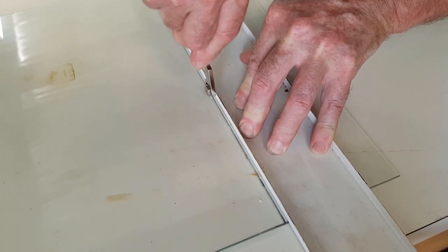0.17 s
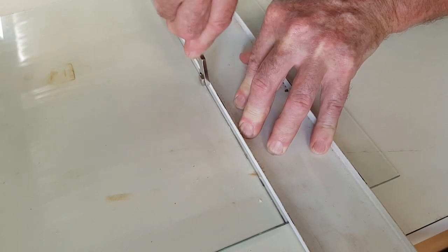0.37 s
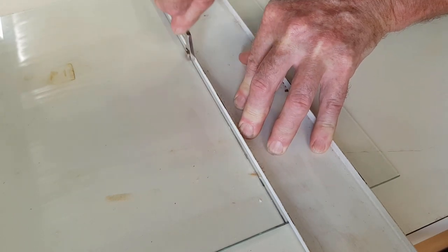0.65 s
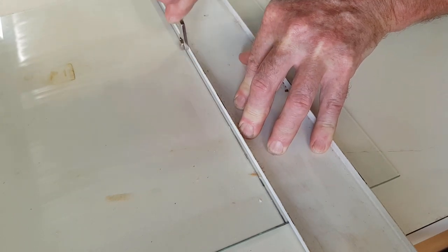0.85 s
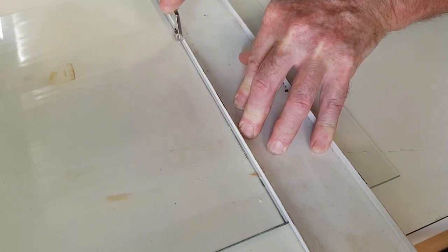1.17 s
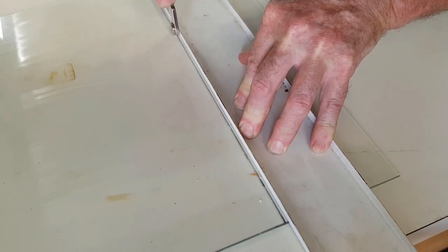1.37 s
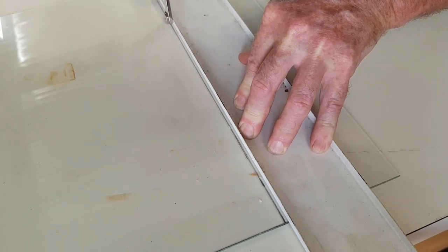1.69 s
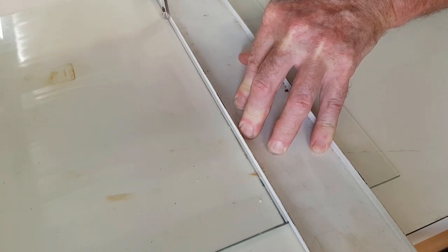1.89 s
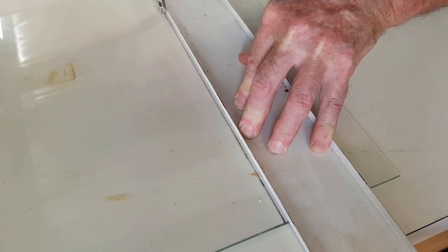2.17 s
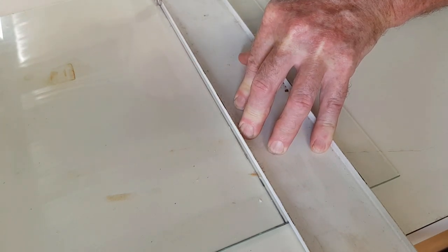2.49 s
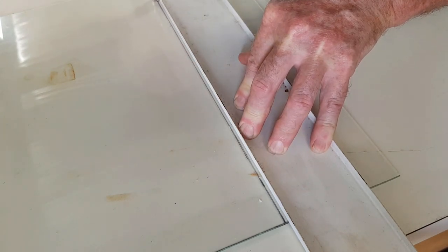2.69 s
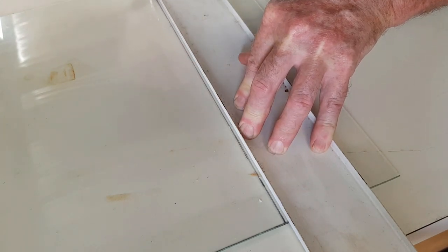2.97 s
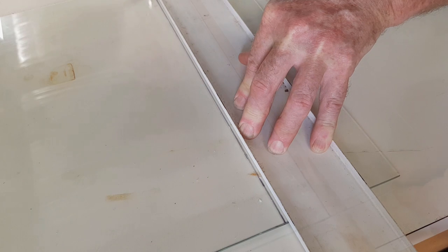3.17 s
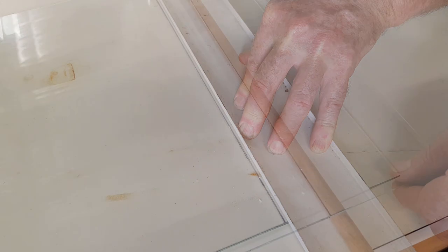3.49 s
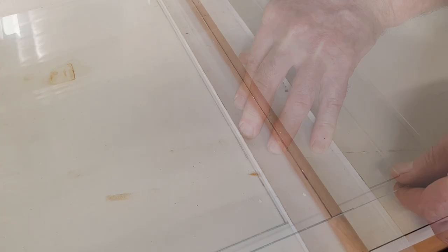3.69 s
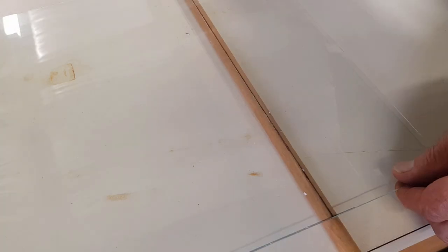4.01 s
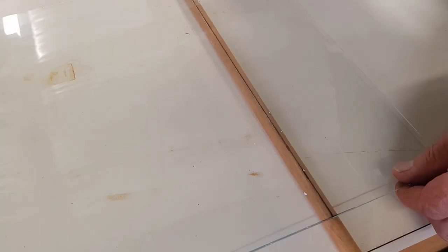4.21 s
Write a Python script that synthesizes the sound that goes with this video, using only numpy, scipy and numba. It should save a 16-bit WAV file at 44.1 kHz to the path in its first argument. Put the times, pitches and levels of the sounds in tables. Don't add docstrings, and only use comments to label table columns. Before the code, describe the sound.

Bright, jerky singing of a small wheel on glass turns to dense crackle, then fades to a quiet room with two muted wood knocks.

```python
import sys
import numpy as np
from scipy import signal
from scipy.fft import rfft, irfft, next_fast_len
from scipy.io import wavfile
from scipy.ndimage import uniform_filter1d
from numba import njit

SR = 44100
rng = np.random.default_rng(int(sys.argv[2]) if len(sys.argv) > 2 else 0)


def inscribe(sig):
    pcm = np.round(np.clip(np.atleast_2d(sig).T, -1, 1) * 32767)
    wavfile.write(sys.argv[1], SR, pcm.astype(np.int16))


def gain_from_decibels(decibels):
    exponent = np.asarray(decibels, float) / 20
    return 10 ** exponent


N = 191614

ROOM_T60_S, ROOM_DB = 0.17, -11
CRUNCH_FROM_S = 1.335


def level(x, db=0):
    return x * gain_from_decibels(db) / np.sqrt(np.mean(x ** 2))


def curves(table):
    s, *columns = np.transpose(table)
    return [np.interp(np.arange(N) / SR, s, column) for column in columns]


def colour(x, points):
    size = next_fast_len(N + SR)
    hz, db = np.transpose(points)
    bin_hz = np.arange(size // 2 + 1) * SR / size
    gain = gain_from_decibels(np.interp(np.log(bin_hz + 1), np.log(hz), db))
    return irfft(rfft(x, size) * gain, size)[..., :N]


@njit
def svf(x, hz, width):
    y, b, l = np.empty(len(x)), 0., 0.
    for i in range(len(x)):
        g, k = np.tan(np.pi * hz[i] / SR), width / hz[i]
        v = (b + g * (x[i] - l)) / (1 + g * (g + k))
        b, l, y[i] = 2 * v - b, l + 2 * g * v, k * v
    return y


def band(x, hz, width):
    return svf(x, np.full(N, 1. * hz), 1. * width)


def walk(rate):
    k = max(int(SR / rate), 1)
    held = np.repeat(rng.standard_normal(N // k + 1), k)
    return 1.13 * uniform_filter1d(uniform_filter1d(held, k), k)[:N]


def decay(t, t60_s):
    return np.exp(-np.log(1000) * t / t60_s)


def burst(t60_s):
    t = np.arange(SR // 2) / SR
    puff = rng.standard_normal(len(t)) * decay(t, t60_s)
    return puff / np.sqrt(np.sum(puff ** 2))


def steady(x, s):
    swell = uniform_filter1d(uniform_filter1d(x ** 2, int(s * SR)), int(s * SR))
    return level(x / (np.abs(swell) + 1e-18) ** 0.33)


def swells(s, hold_s, levels_db, rise_db_s, fall_db_s):
    late = np.arange(0, N, 64)[:, None] / SR - s
    shape = gain_from_decibels(rise_db_s * np.minimum(late, 0) - fall_db_s * np.maximum(late - hold_s, 0))
    return [np.repeat(np.sqrt(shape ** 2 @ gain_from_decibels(db) ** 2), 64)[:N] for db in levels_db]


# (frequency [Hz], density [dB per Hz])
AIR_SPECTRUM = [(60, 6.5), (150, 13), (300, 0), (700, -5), (1550, -4.5), (2300, -4.5), (3500, -11),
                (6000, -19), (9000, -24), (12000, -6), (14900, -7), (16500, -18.5)]


def air():
    noise = level(colour(rng.standard_normal((2, N)), AIR_SPECTRUM), -66.5)
    noise[1] = colour(noise[1], [(300, -1.0), (3000, -7.0), (8000, -2.0), (12000, -0.5)])
    return noise


# (time [s], length [ms], level [dB], wheel ring [Hz])
SINGING_JERKS = [(0.033, 5.6, -52, 12700), (.062, 5, -40, 13200), (.068, 35.4, -49.5, 13000),
                 (.132, 4, -33, 13120), (.138, 19, -39.5, 12400), (0.158, 3.9, -30.5, 11940),
                 (.169, 4.8, -42, 12110), (.237, 11, -45, 13000), (.241, 2.3, -38, 13000),
                 (.249, 8.4, -36, 12300), (0.34, 16.9, -35.5, 12410), (.388, 4.5, -41, 13460),
                 (.4495, 4.8, -30, 12310), (.475, 3.5, -32, 11600), (.496, 8.4, -31.5, 11670),
                 (0.5002, 3.5, -22.5, 11520), (.508, 8, -33, 11600), (.553, 3, -32, 12080),
                 (0.555, 6.3, -27.5, 12020), (0.562, 8.5, -30, 11330), (0.572, 27, -44, 11500),
                 (0.595, 10, -37, 12300), (0.61, 13.4, -44.5, 12430), (0.74, 7, -55, 11800),
                 (.798, 27, -56, 12100), (.889, 3.7, -55, 10800), (.895, 18, -58, 11940),
                 (.964, 7, -53.5, 10700), (1.033, 3.5, -54.5, 10600), (1.083, 6.3, -57, 11800),
                 (1.149, 20, -58, 12300), (1.171, 5.3, -39.5, 13640), (1.252, 7.9, -52, 12700),
                 (1.28, 7.4, -57.5, 10800), (1.29, 3.5, -45.5, 10200)]
# (time [s], length [ms], level [dB])
CRUNCHING_JERKS = [(1.348, 25, -51.5), (1.378, 19.4, -34.5), (1.409, 5.4, -38), (1.419, 6.3, -40),
                   (1.438, 16.3, -36.5), (1.461, 3.6, -39), (1.486, 18, -38.5), (1.504, 41.6, -38.5),
                   (1.56, 49, -40.5), (1.61, 19, -41.5), (1.631, 23, -49), (1.657, 36, -40.5),
                   (1.695, 59, -41.5), (1.755, 7, -64), (1.992, 5, -55), (1.9958, 8.6, -43.5),
                   (2.037, 13, -39), (2.128, 11.5, -45.5), (2.15, 19.7, -39), (2.211, 35, -41.5),
                   (2.253, 51, -39), (2.295, 101, -41), (2.569, 36, -41.5), (2.61, 18, -38),
                   (2.629, 47, -40.5), (2.68, 73, -42), (2.751, 17, -46.5), (2.767, 18.4, -39.5),
                   (2.937, 4.1, -47.5), (2.948, 86, -37), (3.102, 24, -46.5), (3.119, 8.4, -37),
                   (3.403, 6.6, -47), (3.413, 39, -36), (3.453, 14, -40)]
# (time [s], length [ms], level [dB])
TICKS = [(.445, 5.7, -47), (0.641, 4.3, -39.5), (0.978, 8.8, -51.5), (.994, 4.4, -54.5),
         (1.773, 2.9, -39.5), (2.01, 4.1, -45), (1.315, 2.2, -52), (1.3445, 2.6, -39), (1.476, 4.7, -47),
         (1.821, 2.9, -46), (1.836, 6.3, -46.5), (1.938, 2.4, -52), (2.062, 4.3, -37.5), (2.202, 5.2, -41),
         (2.531, 2.1, -44), (2.537, 3.4, -57), (2.545, 2.5, -48), (2.459, 2.8, -54), (2.494, 2.5, -57.5),
         (2.519, 3.5, -55), (2.562, 4, -47), (2.904, 4.3, -59), (3.098, 3.1, -37), (3.148, 5.3, -46.5),
         (3.289, 4.8, -56), (3.2985, 2.9, -49), (3.312, 2.9, -42), (3.32, 3.2, -50), (3.327, 2.5, -56),
         (3.209, 20, -62.5), (3.476, 1.7, -43), (3.486, 2.8, -59), (.195, 2.7, -44), (.703, 2.8, -55),
         (.817, 2.1, -57), (.94, 2.5, -57), (.95, 2.5, -63), (1.069, 2.5, -66), (1.327, 2.8, -53),
         (1.355, 2.5, -57), (1.865, 2.5, -59), (1.97, 2.3, -64), (2.113, 2.3, -50), (3.396, 3.2, -45)]
# (time [s], level [dB])
DRAG = [(0, -58), (.12, -55.5), (.22, -70), (.33, -60.5), (.42, -60), (.66, -52), (.79, -61.5),
        (.86, -70.5), (.94, -63.5), (1.03, -69), (1.1, -76), (1.22, -63.5), (1.3, -76), (1.86, -59),
        (1.91, -68), (2.0, -75), (2.5, -64.5), (3.2, -78), (4.34, -92.5)]
SKIPS = [.153, .245, .56, 1.379, 1.386, 1.457, 1.492, 1.581, 1.663, 1.669, 1.689, 1.724, 2.046, 2.134,
         2.217, 2.224, 2.238, 2.264, 2.283, 2.316, 2.574, 2.607, 2.639, 2.658, 2.669, 2.941, 2.972, 2.976,
         2.988, 2.715]


def jerks():
    # (drop [dB], trail [dB per s])
    sing_trail, crunch_trail, tick_trail = (-13, 310), (-8.5, 296), (-14, 310)
    rest_hz, relax_s = 12410, 0.019
    drift_from_s, drag_ring_to_s = 1.65, .86
    drag_ring, early_ring, crunch_ring = .45, .24, .1
    silent_db, pure_db = -60, -20
    skip_s, skip_db, crack_delay_s = .0035, -10, .0004

    force, ring_hz, first = gain_from_decibels(curves(DRAG)[0]), np.full(N, 1. * rest_hz), np.zeros(N)
    rows = [row[:3] + sing_trail + row[3:] for row in SINGING_JERKS]
    late = [row + crunch_trail for row in CRUNCHING_JERKS] + [row + tick_trail for row in TICKS]
    rows += [row + (hz,) for row, hz in zip(late, rng.uniform(10100, 13500, len(late)))]
    after = np.arange(SR // 5) / SR
    for s, ms, db, drop_db, trail, hz in sorted(rows):
        a = int(s * SR)
        span = slice(a, a + len(after))
        first[a + int(crack_delay_s * SR)] = gain_from_decibels(db) > 2 * force[a - 1]
        since = after - ms / 1000
        force[span] = np.maximum(force[span], gain_from_decibels(db + (since > 0) * (drop_db - trail * since)))
        if s > drift_from_s or trail == sing_trail[1]:
            ring_hz[span] = rest_hz + (hz - rest_hz) * np.exp(-np.maximum(since, 0) / relax_s)
    share = np.clip((20 * np.log10(force) - silent_db) / (pure_db - silent_db), 0, .93)
    drag_end = int(drag_ring_to_s * SR)
    share[:drag_end] = np.maximum(share[:drag_end], drag_ring)
    share[int(CRUNCH_FROM_S * SR):] = early_ring
    share[int(drift_from_s * SR):] = crunch_ring
    for s in SKIPS:
        force[int(s * SR):int((s + skip_s) * SR)] *= gain_from_decibels(skip_db)
        first[int((s + skip_s + crack_delay_s) * SR)] = 0.91
    rough = gain_from_decibels(1.4 * walk(400) + .5 * walk(83))
    return np.abs(uniform_filter1d(force, int(0.00031 * SR))) * rough, ring_hz, share, first


def cracks(per_s, spread_db, lone_per_s=0):
    when, sign, luck = rng.random((N, 3)).T
    size = gain_from_decibels(spread_db * np.minimum(-np.log(1 - luck), 2.9))
    size = np.where(when < lone_per_s / SR, gain_from_decibels(11 - 6 * luck), size)
    return level((when < per_s / SR) * np.sign(sign - .5) * size)


# (frequency [Hz], width [Hz], level [dB])
WHEEL_UPPER = [(13950, 350, -5), (15300, 380, -9.5)]


def singing(force, ring_hz, share):
    drive, width = force * np.sqrt(share), 650.
    shower = cracks(per_s=3000, spread_db=5.5)
    hits = shower * drive
    struck = svf(hits, ring_hz, width) / np.sqrt(np.mean(band(shower, 17000, width) ** 2))
    for hz, w, db in WHEEL_UPPER:
        struck = struck + gain_from_decibels(db) * band(hits, hz, w) / np.sqrt(np.mean(band(shower, hz, w) ** 2))
    keep = np.exp(-1 / (0.0018 * SR))
    swell = signal.lfilter([1 - keep], [1, -keep], drive * share ** 2.28)
    turns = 2 * np.pi * np.cumsum(ring_hz * (1 + .009 * walk(250))) / SR
    squeal = np.sqrt(2) * np.sin(turns) * gain_from_decibels(2.5 * walk(350))
    return np.sqrt(1 - 1.03 * share) * struck + 4.04 * swell * squeal


# (time [s], first lag [ms], second lag [ms])
ECHOES = [(0, 0.38, 0.77), (.55, 0.35, 0.8), (1.5, 0.61, 1.09), (1.7, 0.68, 2.07), (2.0, 0.5, 1.27),
          (2.3, 0.65, 1.4), (2.7, .46, 2.2), (3.0, 0.48, 1.62), (3.43, 0.29, 0.76)]


def delayed(x, ms):
    return np.interp(np.arange(N) - np.round(ms * SR / 1000), np.arange(N), x)


def echoed(x):
    return level(x + gain_from_decibels(-17.5) * sum(delayed(x, ms) for ms in curves(ECHOES)))


# (time [s], peak [dB])
HARD_EARLY = [(1.344, -26), (1.3766, -29), (1.3839, -26), (1.3907, -25), (1.3923, -24), (1.3952, -26),
              (1.4399, -27), (1.4495, -25), (1.4515, -27), (1.489, -28), (1.4965, -29), (1.5093, -26),
              (1.5156, -23), (1.5172, -25), (1.5218, -28), (1.524, -27), (1.528, -26), (1.5334, -26),
              (1.5354, -27), (1.5432, -28), (1.5615, -28), (1.5713, -28), (1.5777, -28), (1.5797, -28),
              (1.586, -26), (1.5923, -25), (1.5939, -28), (1.5975, -25), (1.6082, -27), (1.6578, -25),
              (1.6815, -28), (1.719, -27), (1.7331, -27), (1.752, -29), (2.0386, -27), (2.0442, -28),
              (2.153, -28), (2.1668, -27), (2.2557, -29), (2.2984, -27), (2.3033, -27), (2.3058, -28),
              (2.3125, -27), (2.3202, -28), (2.3222, -28), (2.3247, -25), (2.3266, -25), (2.3339, -26),
              (2.3365, -25), (2.3399, -24), (2.346, -29), (2.3532, -28), (2.3562, -28), (2.36, -26),
              (2.367, -29), (2.3784, -23), (2.3885, -28), (2.393, -26), (2.3966, -27), (2.4002, -29)]
# (time [s], peak [dB])
HARD_LATE = [(2.5773, -26), (2.5815, -26), (2.5837, -25), (2.6146, -26), (2.6339, -26), (2.6854, -24),
             (2.6951, -26), (2.6996, -22), (2.7042, -26), (2.7079, -26), (2.7117, -26), (2.7181, -25),
             (2.723, -25), (2.726, -26), (2.731, -24), (2.7336, -24), (2.7358, -24), (2.7385, -26),
             (2.7408, -26), (2.7434, -25), (2.7459, -24), (2.7492, -25), (2.7654, -26), (2.7679, -24),
             (2.7707, -23), (2.7755, -24), (2.7784, -21), (2.7822, -24), (2.9503, -23), (2.9538, -25),
             (2.9556, -25), (2.9576, -25), (2.9643, -23), (2.9807, -25), (2.9838, -24), (2.9952, -24),
             (3.0037, -23), (3.0059, -23), (3.0105, -24), (3.0127, -21), (3.0149, -22), (3.0175, -21),
             (3.0191, -24), (3.024, -25), (3.0263, -25), (3.0329, -26), (3.0363, -25), (3.0982, -25),
             (3.1245, -22), (3.1266, -26), (3.3128, -26), (3.4037, -25), (3.4134, -22), (3.4155, -24),
             (3.4199, -25), (3.4227, -26), (3.4286, -25), (3.4314, -26), (3.4345, -26), (3.4443, -22)]
# (time [s], peak [dB])
HARD_OPENING = [(1.4632, -31), (1.4765, -33), (1.6965, -31), (1.7465, -31), (1.8215, -38), (1.8365, -33),
                (1.998, -31), (2.011, -32), (2.0635, -29), (2.1292, -33), (2.203, -30), (2.5308, -29),
                (2.5362, -31), (2.563, -36), (2.5705, -29), (2.6293, -27), (2.643, -29), (2.662, -29),
                (2.6735, -31), (2.6842, -26), (2.938, -28), (2.9398, -28), (3.1483, -29), (3.2985, -28),
                (3.32, -29), (3.396, -30), (3.4762, -30), (3.407, -27), (3.4106, -29), (3.417, -26),
                (3.4213, -28), (3.4245, -28), (3.4432, -23), (3.4608, -30), (3.4655, -28)]
# (frequency [Hz], density [dB per Hz])
CRACK_SPECTRUM = [(3000, -62), (5000, -22.5), (6650, -26.5), (9060, -10), (10000, -1), (12600, 2.5),
                  (15600, 0.5), (16300, -17.5), (16500, -31)]


def hard():
    s, db = np.transpose(HARD_EARLY + HARD_LATE + HARD_OPENING)
    smear_s, echo_db = .0012, -9
    clicks = np.zeros(N)
    clicks[(s * SR).astype(int)] = gain_from_decibels(db) * (-1.) ** np.arange(len(s))
    clicks = colour(clicks, CRACK_SPECTRUM)
    clicks = clicks * gain_from_decibels(np.max(db) + 1.5) / np.max(np.abs(clicks))
    late = delayed(clicks, curves(ECHOES)[1])
    k = np.arange(64)
    smear = np.cos(k ** 2) * np.exp(-k / (smear_s * SR / 3))
    smear = smear / np.sqrt(np.sum(smear ** 2))
    return clicks + gain_from_decibels(echo_db) * signal.fftconvolve(late, smear)[:N]


def bites():
    hush_s, hush, bite_s, rest = .0009, .4, .005, .56
    s = np.sort(np.transpose(HARD_EARLY + HARD_LATE + HARD_OPENING)[0])
    t = np.arange(N) / SR
    since = t - np.append(-1, s)[np.searchsorted(s, t + hush_s / 2)]
    gain = np.where(since < hush_s, hush, rest + (1.45 - rest) * np.exp(-since / bite_s))
    return np.where(t > CRUNCH_FROM_S, gain, 1)


# (time [s], sheet body [dB], lower edge of the hiss [dB])
DEPTH = [(0, -21, 9.5), (.3, -20, 2.5), (.5, -16, -6), (.7, -20.5, 6), (1.0, -25, 14.5), (1.2, -21, -6),
         (1.4, -14.5, 0.5), (1.7, -16.5, 1), (2.0, -14, 7), (2.3, -17.5, 8), (2.6, -17, 10.5),
         (2.8, -11, 6.5), (3.0, -14, 5.5), (3.2, -15.5, -6.5), (3.45, -13, 4.5), (3.6, -13, 19.5)]
# (time [s], level [dB])
SHEEN = [(0, 4.5), (.5, 3.5), (1.0, -8), (1.5, 2.5), (2.0, -2.5), (2.3, -0.5), (2.65, -1), (2.78, -4),
         (3.0, -1.5), (3.3, -6), (3.45, -9.5)]
# (frequency [Hz], width [Hz], level [dB])
GLASS_MODES = [(9520, 54.9, -28.5), (10300, 500, 4), (10930, 29, 3), (11500, 88.2, -6.5), (12300, 210, 6),
               (12700, 14, 13), (13000, 41, -4.5), (13000, 120, -12.5), (12560, 490, 4), (15800, 190, 9),
               (14200, 67, 2)]
# (frequency [Hz], density [dB per Hz])
SHEET_SPECTRUM = [(180, -35.5), (400, -21), (620, -22), (900, -15.5), (2190, -2.5), (2500, -4),
                  (3720, -8.5), (6000, -10), (9000, -4.5), (15000, -39.5)]


def wheel():
    force, ring_hz, share, first = jerks()
    force = force * bites()
    body_db, edge_db = curves(DEPTH)
    sheen_db = curves(SHEEN)[0]
    dense = cracks(per_s=6500, spread_db=2.5, lone_per_s=50)
    shower = dense + 4.5 * first
    lines = np.zeros(N)
    for k, (hz, width, db) in enumerate(GLASS_MODES):
        lines += (-1) ** k * gain_from_decibels(db) * level(band(shower, hz, width))
    broad = echoed(colour(shower, CRACK_SPECTRUM))
    glass = level(broad + level(lines, -10.0))
    ring = singing(force, ring_hz, share)
    slow = np.abs(uniform_filter1d(force, int(.009 * SR), origin=int(.003 * SR)))
    body = level(colour(0.63 * dense + 1.5 * cracks(per_s=12000, spread_db=3.0), SHEET_SPECTRUM))
    crunch = force * np.sqrt(1 - share) * glass + hard()
    crunch = crunch + (gain_from_decibels(edge_db) - 1) * colour(crunch, [(9500, -4.0), (11200, -23.5)])
    crunch = crunch + (gain_from_decibels(sheen_db) - 1) * colour(crunch, [(12300, -23.5), (13800, -1.0)])
    return crunch + ring + gain_from_decibels(body_db - 40.5) * (slow / gain_from_decibels(-41.5)) ** 0.61 * body


def shaken(modes):
    push = rng.standard_normal(N)
    total = np.zeros(N)
    for k, (hz, width, db) in enumerate(modes):
        total += (-1) ** k * gain_from_decibels(db) * level(band(band(push, hz, width), hz, 2 * width))
    return level(total)


# (time [s], lowest modes [dB], upper modes [dB])
SHOVES = [(0.029, -42, -54), (0.167, -41.5, -52.5), (.27, -47.5, -54), (0.374, -41, -53.5),
          (0.449, -37.5, -46), (0.522, -41, -45), (0.619, -40.5, -48.5), (.82, -51.5, -60.5),
          (.97, -49, -61.5), (1.03, -66, -83), (1.218, -40.5, -61), (1.391, -49, -55.5), (1.54, -50, -68),
          (1.631, -49.5, -67), (1.7, -49.5, -68), (1.78, -51, -69.5), (2.049, -53.5, -69), (2.18, -56, -66),
          (2.343, -49.5, -53), (2.529, -56, -58), (2.633, -47, -63), (2.71, -58, -69), (2.779, -48, -62),
          (2.993, -46.5, -52), (3.132, -49.5, -59.5), (3.338, -53.5, -66), (3.47, -54, -66.5),
          (3.92, -57.5, -54.5), (4.07, -67, -58.5), (4.21, -71, -75.5)]
# (frequency [Hz], width [Hz], level [dB])
TABLE_LOWEST = [(49, 8.4, -7), (66.14, 10.1, -4.5), (73.6, 16.3, -8.5)]
# (frequency [Hz], width [Hz], level [dB])
TABLE_UPPER = [(115.3, 23, 1), (187.3, 39.6, -6.5), (210.5, 51, -6.5), (340, 980, -21.5)]


def rumble():
    rise_db_s, hold_s, fall_db_s, rest_db = 401, 0.04, 153.5, -76
    s, *levels_db = np.transpose(SHOVES)
    low, high = swells(s - hold_s / 2, hold_s, levels_db, rise_db_s, fall_db_s)
    upper = shaken(TABLE_UPPER) + 0.4 * np.array([shaken(TABLE_UPPER), shaken(TABLE_UPPER)])
    lowest = (low + gain_from_decibels(rest_db)) * steady(shaken(TABLE_LOWEST), 0.12)
    return lowest + high * gain_from_decibels(-3.0 + 1.5 * walk(25.13)) * upper


# (time [s], length [s], second partial [dB], third partial [dB])
SQUEAKS = [(0.354, 0.03, -76, -70), (0.5, 0.016, -86, -62.5), (0.58, 0.067, -71, -68.5),
           (0.786, 0.14, -72, -74), (0.976, 0.041, -71, -66.5), (1.173, 0.061, -75, -70.5),
           (1.352, 0.11, -73, -71), (1.498, 0.082, -64.5, -69), (1.682, 0.062, -67, -63),
           (1.783, 0.1, -73, -66.5), (2.029, 0.032, -77, -65.5), (2.113, 0.084, -73.5, -69.5),
           (2.29, 0.12, -76.5, -72), (2.617, 0.09, -84, -67), (2.8, 0.042, -67.5, -70),
           (2.856, 0.029, -63, -68), (2.913, 0.02, -72, -79), (2.96, 0.032, -74, -67),
           (3.07, .05, -72, -73), (3.414, 0.059, -71, -67.5), (3.663, 0.12, -98, -77.5)]
# (time [s], pitch [Hz])
SQUEAK_HZ = [(0, 890), (.7, 857), (.95, 840), (1.15, 791), (1.35, 844), (1.55, 847), (1.75, 825),
             (1.84, 860), (1.9, 840), (2.8, 847), (2.9, 863.5), (3.95, 853)]
# (multiple, level against the third [dB])
SQUEAK_OTHERS = [(1, -18), (4, -12.5)]


def squeak():
    s, hold_s, *levels_db = np.transpose(SQUEAKS)
    second, third = swells(s, hold_s, levels_db, rise_db_s=353, fall_db_s=246.5)
    hz = curves(SQUEAK_HZ)[0] * (1 + .007 * walk(30))
    partials = [(2, second), (3, third)] + [(k, third * gain_from_decibels(db)) for k, db in SQUEAK_OTHERS]
    turns = 2 * np.pi * np.cumsum(hz) / SR
    pure = np.clip(second / gain_from_decibels(-62), 0, .9) ** 2
    total = np.zeros(N)
    for k, gain in partials:
        blurred = steady(svf(rng.standard_normal(N), k * hz, 37.0 * k), 0.11)
        tone = np.sqrt(1 - pure) * blurred + np.sqrt(2 * pure) * np.sin(k * turns)
        total += gain * gain_from_decibels(3.0 * walk(35)) * tone
    return total


# (time [s], peak [dB], pitch [Hz], thud [dB], t60 [s])
KNOCKS = [
    (3.561, -61.5, 870, -16, 0.19),
    (3.716, -54.5, 577, -10, 0.053),
    (3.835, -50.5, 618, -35, 0.05),
    (3.86, -53, 1424, -13, 0.16),
    (3.884, -37, 572, -27, 0.055),
    (3.905, -60, 1030, -7, 0.2),
    (4.048, -47.5, 340, -7.5, 0.086),
    (4.059, -43, 570, -5.5, 0.098),
    (4.08, -60, 200, 2, 0.26),
    (4.199, -65, 600, -11, 0.16),
]
# (frequency [Hz], level [dB], t60 [s])
WOOD_MODES = [(592, -5.5, 0.035), (890, -5, 0.016), (1030, -13.5, 0.097), (1210, -34, 0.049),
              (1397, -10, 0.03), (2220, -12, .03), (1140, -29.5, 0.018)]
# (frequency [Hz], level [dB], t60 [s])
THUD_MODES = [(126.8, -5, 0.3), (200, 3.5, 0.079), (333, 0.5, 0.021), (463, -6.5, 0.14)]


def ringing(x, modes):
    return sum(gain_from_decibels(db) * np.sqrt(t60) * band(x[:N], hz, 1.87 / t60) for hz, db, t60 in modes)


def knocks():
    note, wood, thud = np.zeros((3, N + SR))
    t = np.arange(SR // 4) / SR
    for s, db, hz, thud_db, t60 in KNOCKS:
        span = slice(int(s * SR), int(s * SR) + len(t))
        rattle = gain_from_decibels(db) * rng.standard_normal(len(t)) * decay(t, t60) * np.minimum(t / 0.0062, 1)
        wood[span] += rattle
        thud[span] += gain_from_decibels(thud_db) * rattle
        tone = np.sin(2 * np.pi * hz * t) * decay(t, 0.049) * np.minimum(t / 0.003, 1)
        note[span] += gain_from_decibels(db - 4.0) * tone
    blows = note[:N] + gain_from_decibels(-8.0) * wood[:N]
    blows = blows + gain_from_decibels(29.0) * ringing(wood, WOOD_MODES) + gain_from_decibels(36.0) * ringing(thud, THUD_MODES)
    return colour(blows, [(1300, 1.0), (1800, -22), (2400, -32), (4000, -12), (8000, -48)])


# (time [s], length [s], pitch [Hz], level [dB])
RUBS = [
    (3.858, 0.04, 2250, -74.5),
    (4.075, 0.063, 3600, -84),
]


def rubs():
    s, hold_s, hz, db = np.transpose(RUBS)
    each_db = np.where(np.eye(len(s)), db, -200)
    shapes = swells(s, hold_s, each_db, rise_db_s=500., fall_db_s=300.)
    noise = rng.standard_normal(N)
    return sum(shape * level(band(band(noise, f, 240.), f, 300.)) for shape, f in zip(shapes, hz))


# (frequency [Hz], gain [dB])
SHADE = [(60, -9), (300, -9.5), (600, -18.5), (1300, -10.5), (2400, -20), (4400, -14), (8000, -22),
         (11500, -17.5), (15000, -18.5)]


def shaded(x):
    turn = 2 * np.pi * 1.348 * np.arange(N) / SR + 1.76 * walk(25.0)
    paths = [signal.fftconvolve(x, burst(0.012) + gain_from_decibels(-2.5) * burst(ROOM_T60_S))[:N] for _ in range(2)]
    direct = gain_from_decibels(-8.0) * np.roll(x, 5)
    return colour(direct + np.cos(turn) * paths[0] + np.sin(turn) * paths[1], SHADE)


# (time [s], treble gain [dB])
FADE = [
    (0, -2),
    (3.5, 1.5),
    (3.58, -4.5),
    (3.62, -27),
    (4.34, -40),
]


def faded(x):
    return x + (gain_from_decibels(curves(FADE)[0]) - 1) * colour(x, [(3000, -31), (6000, 4.0)])


def scene():
    axle = squeak()
    near = wheel() + knocks()
    source = near + axle
    left = 2 * source + 2 * gain_from_decibels(ROOM_DB) * signal.fftconvolve(source, burst(ROOM_T60_S))[:N]
    right = shaded(2 * (near + gain_from_decibels(-2.5) * axle))
    heard = faded(np.array([left, right]))
    table = rumble() * gain_from_decibels([[1.3], [-1.5]])
    return heard + table + air() + rubs() * gain_from_decibels([[4.0], [-6.0]])


def roll_off(x):
    return signal.sosfilt(signal.butter(12, 16820, fs=SR, output="sos"), x)


def record(dry):
    x = signal.sosfilt(signal.butter(2, 35, "highpass", fs=SR, output="sos"), dry)
    x = signal.sosfilt(signal.ellip(10, .2, 52, 15720, fs=SR, output="sos"), x)
    return roll_off(x)


dry = scene()
out = record(dry)
inscribe(out)
```